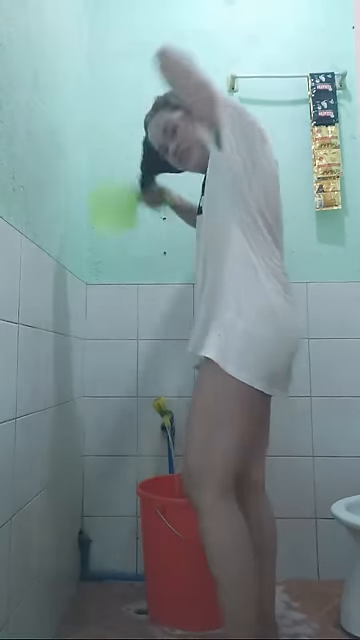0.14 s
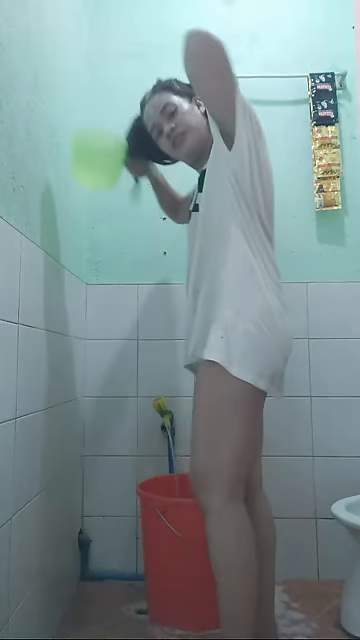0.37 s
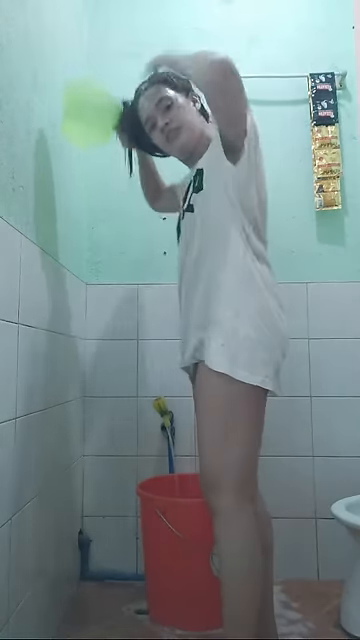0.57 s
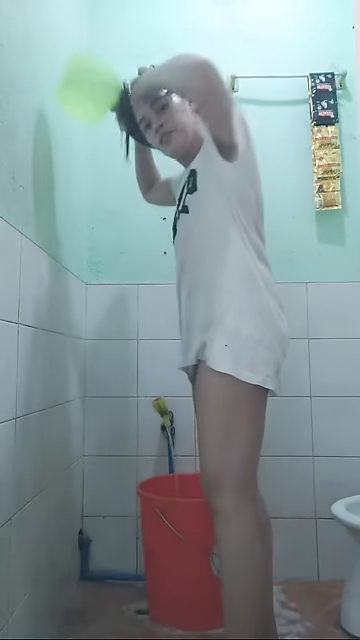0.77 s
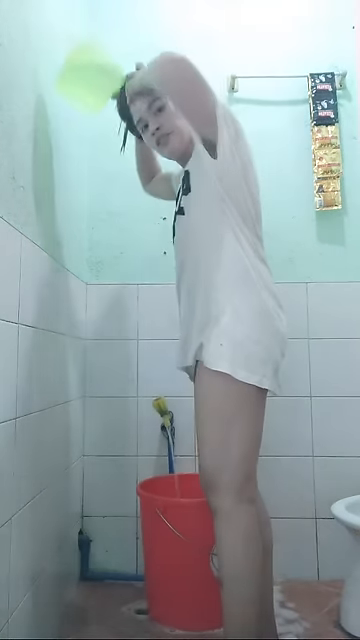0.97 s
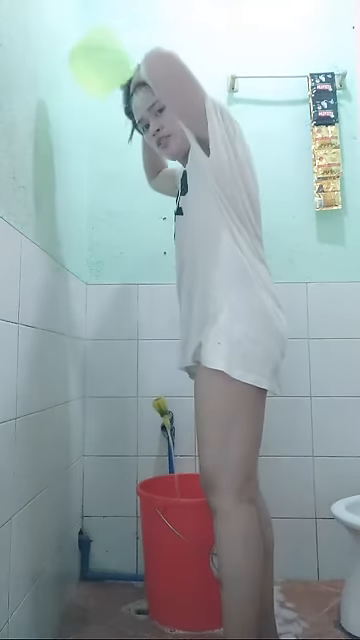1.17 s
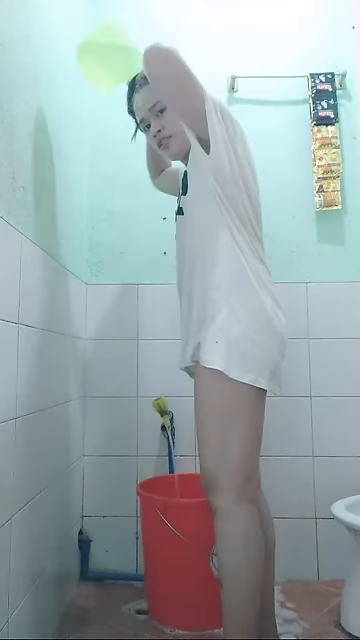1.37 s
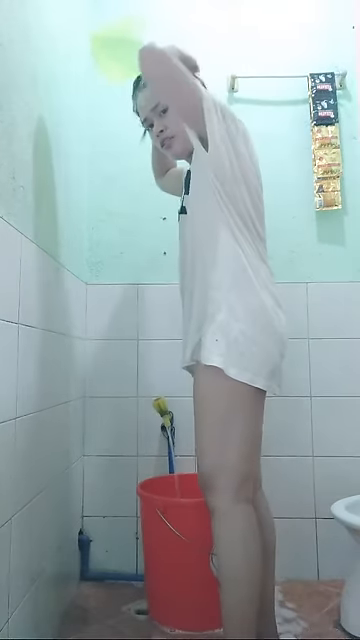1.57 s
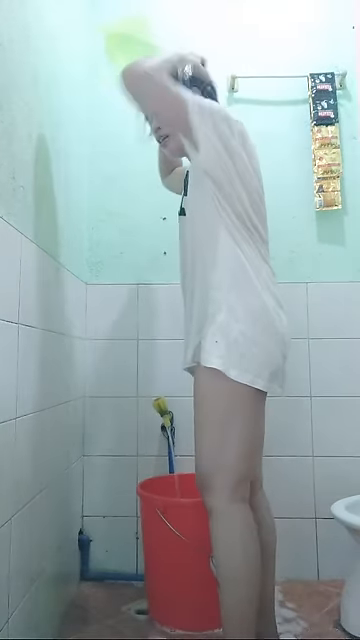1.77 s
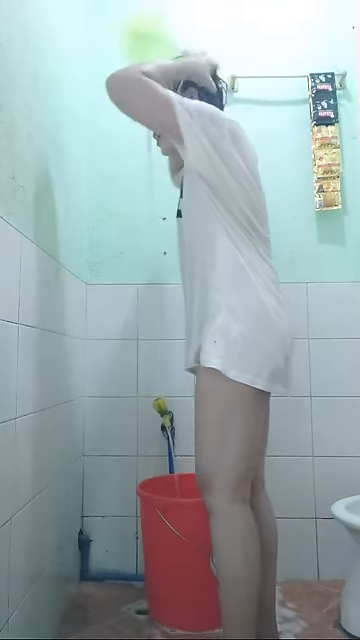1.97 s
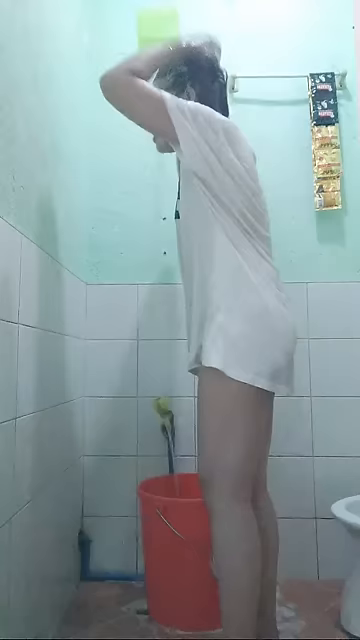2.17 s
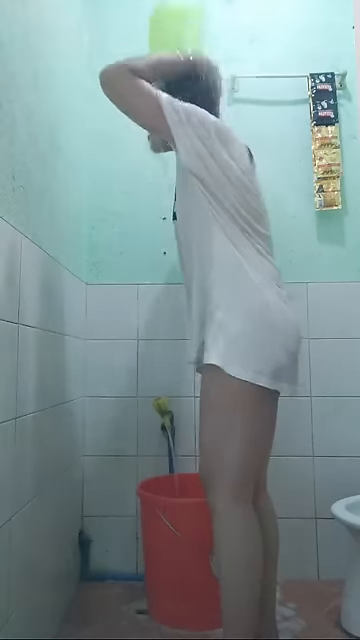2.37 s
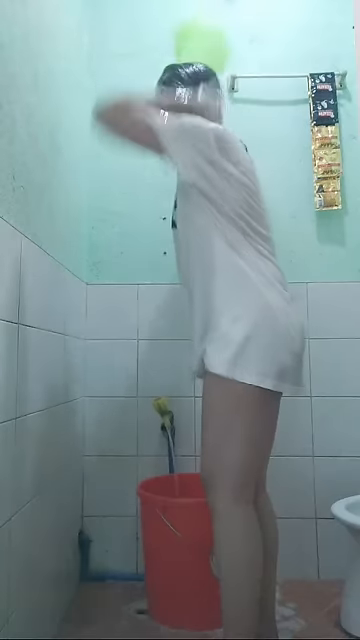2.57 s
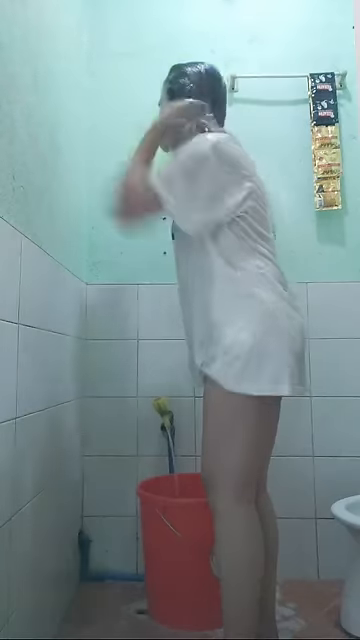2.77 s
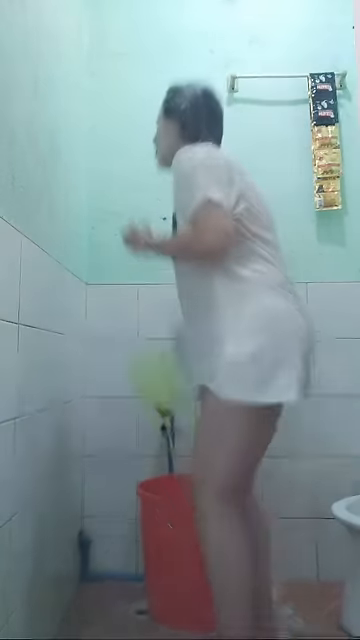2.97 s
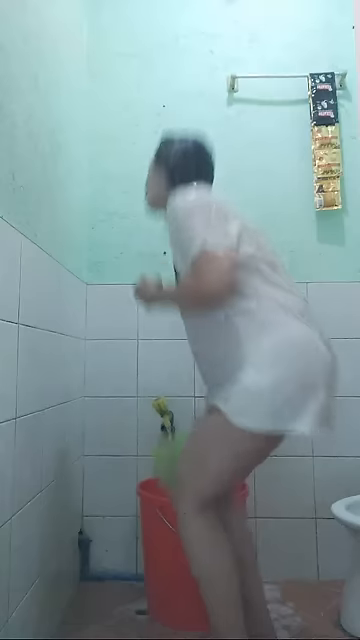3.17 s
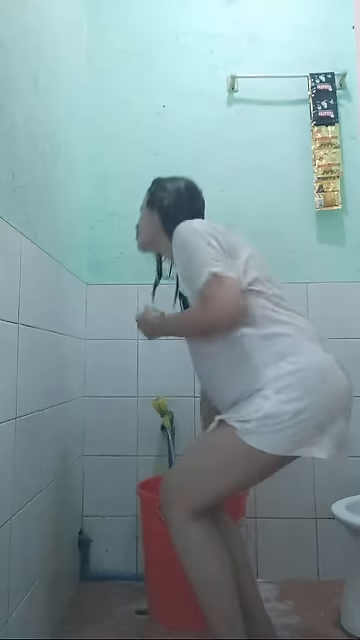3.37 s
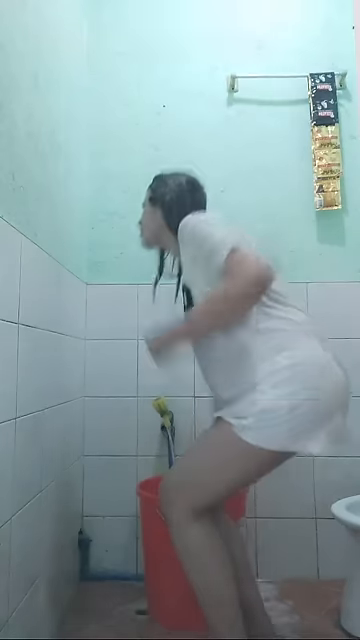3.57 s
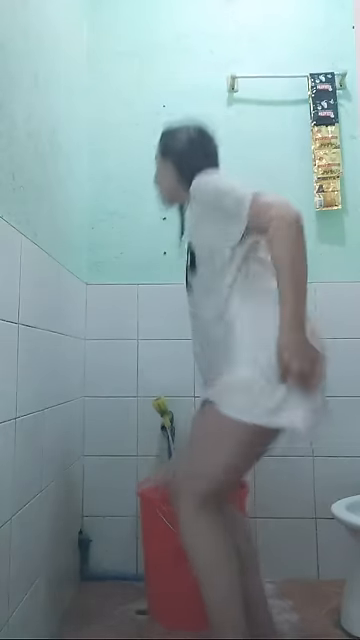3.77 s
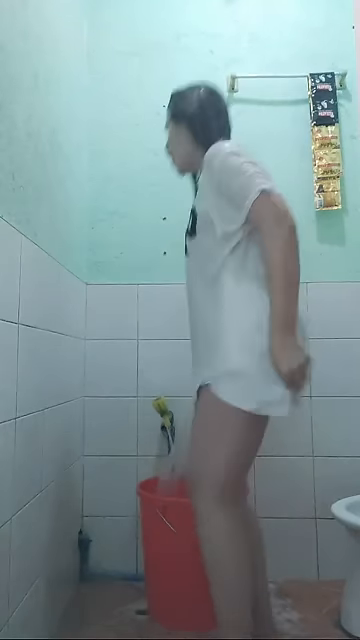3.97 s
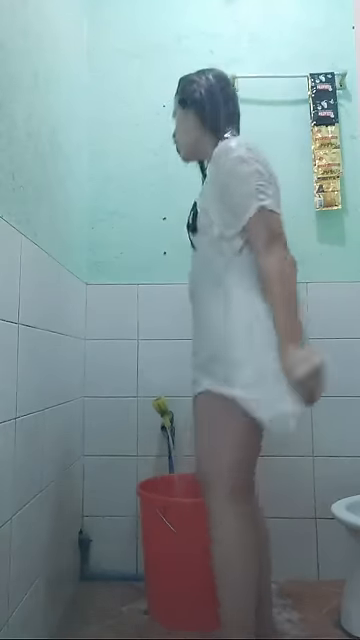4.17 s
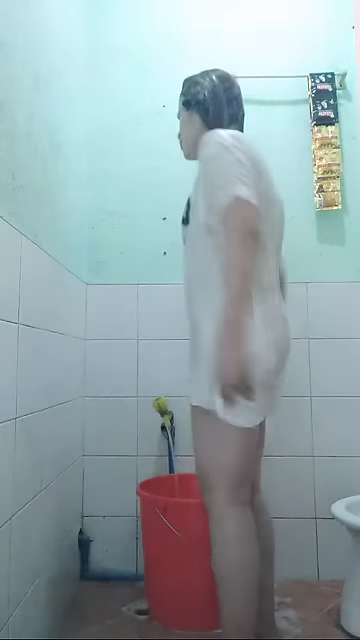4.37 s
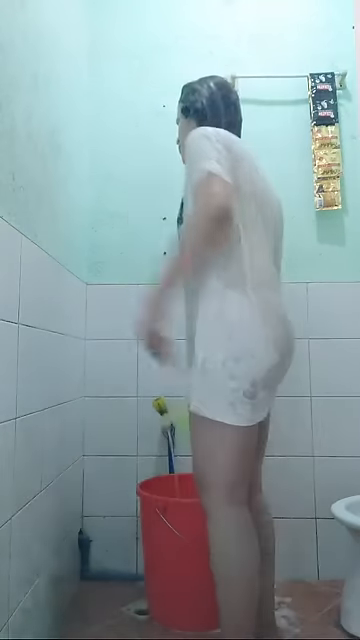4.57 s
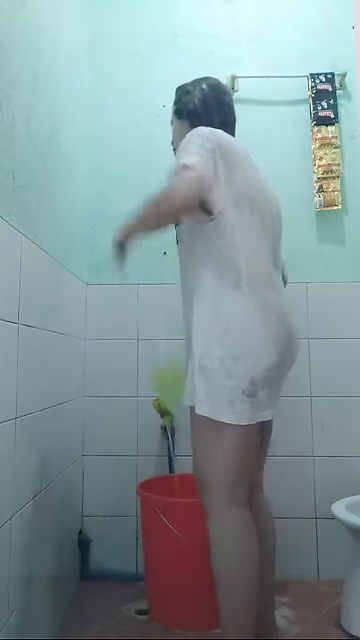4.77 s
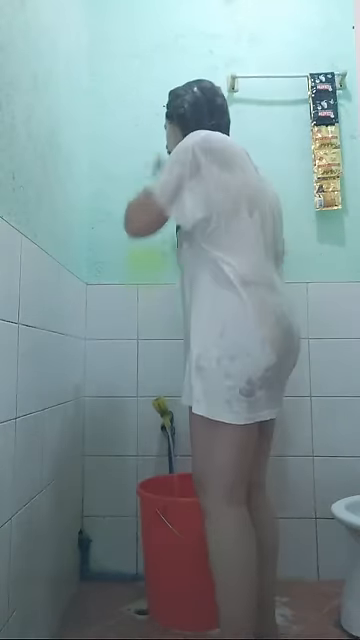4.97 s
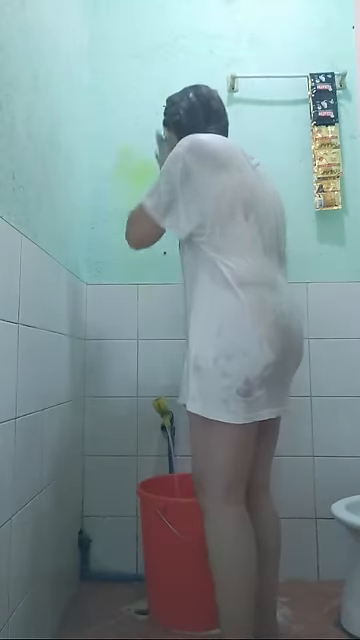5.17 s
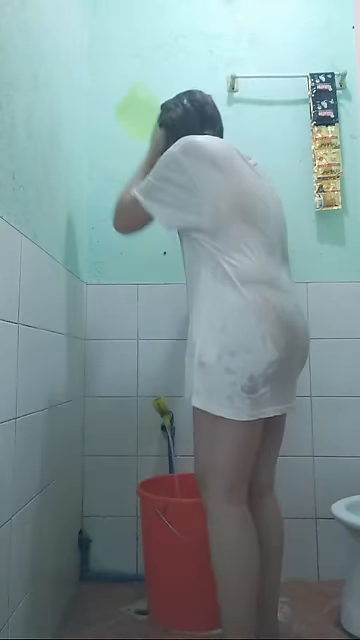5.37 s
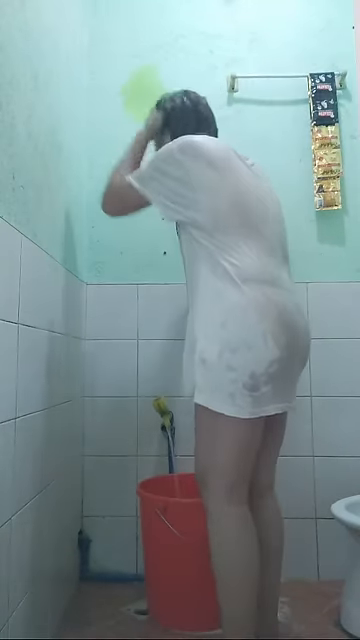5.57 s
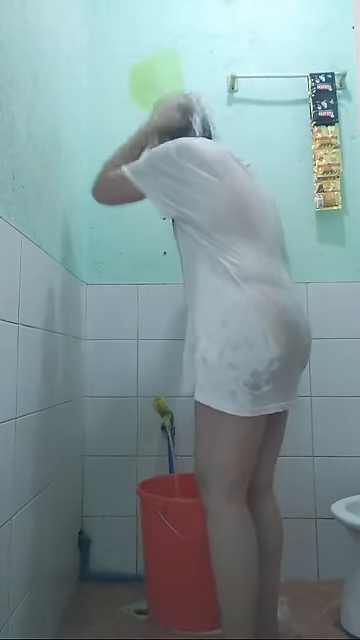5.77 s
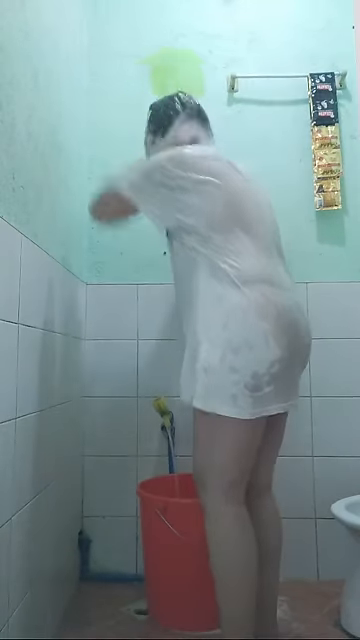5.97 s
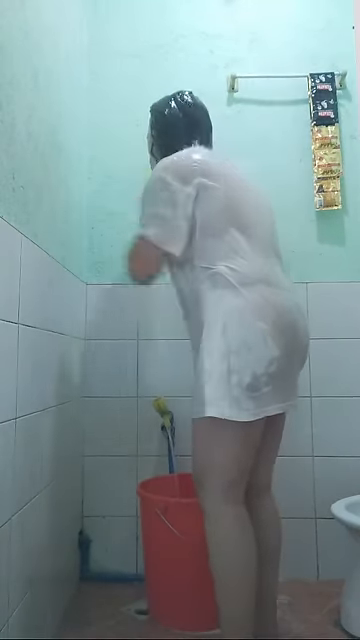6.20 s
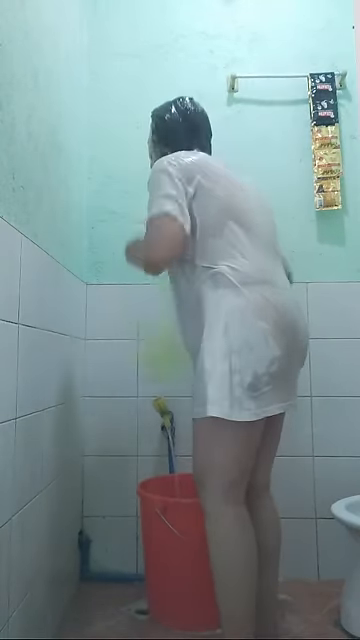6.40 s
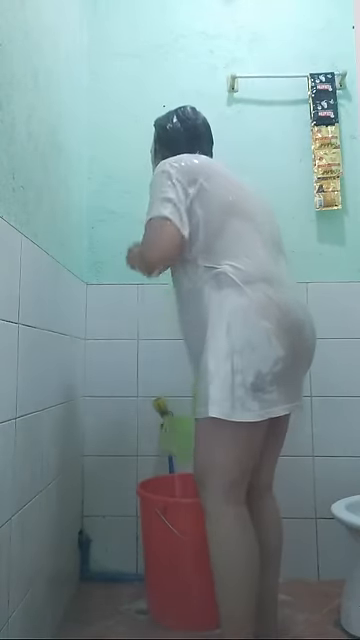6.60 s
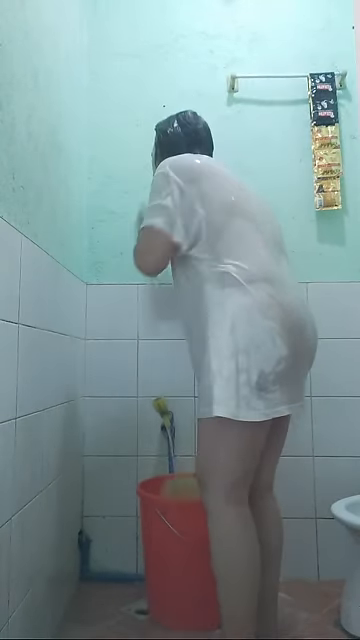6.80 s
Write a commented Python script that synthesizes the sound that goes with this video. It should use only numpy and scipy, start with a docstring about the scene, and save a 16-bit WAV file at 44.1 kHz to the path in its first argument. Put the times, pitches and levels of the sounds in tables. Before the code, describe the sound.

Steady trickle into a half-full bucket, two bursts of poured water slapping tiles, churning between, then a hollow plastic knock.

```python
"""Bathing with bucket and dipper

A tap runs into a half-full plastic bucket in a small tiled bathroom: ticks and bubbles patter and gurgle.
Twice a dipper of water is tipped over a bather and falls on the floor in sheets and drops, made of
filtered clicks and swarms of bubbles. In between, the dipper churns the bucket. At the end it knocks
into the bucket, which rings as a set of fading tones with a noisy crack."""
import sys
import numpy as np
from scipy import signal
from scipy.io import wavfile
from scipy.ndimage import uniform_filter1d

SR = 44100
rng = np.random.default_rng(int(sys.argv[2]) if len(sys.argv) > 2 else 0)


def master(y):
    """Save y as 16-bit WAV."""
    cut = np.clip(np.atleast_2d(y).T, -1, 1)
    pcm = np.round(cut * 32767)  # scale
    wavfile.write(sys.argv[1], SR, pcm.astype(np.int16))


N = 301644
TIME = np.arange(N) / SR  # seconds, whole scene
RING = np.arange(SR // 4) / SR  # seconds, one short event


def amp(db):
    """Turns decibels into gain."""
    return 10 ** (np.asarray(db) / 20)


def evened(x):
    """Scales a sound to an rms of 1."""
    return x / np.sqrt(np.mean(x ** 2) + 1e-20)


def read(points, hz):
    """Reads a table of values between its frequencies, on a log-frequency axis."""
    f, value = np.transpose(points)
    return np.interp(np.log(hz + 1), np.log(f + 1), value)


def add(mix, s, sound):
    """Mixes a sound in at time s."""
    part = mix[max(round(s * SR), 0):][:len(sound)]
    part += sound[:len(part)]


def colour(x, db_at, size=4096):
    """Filters with the gain db_at(Hz), never ahead of time, so that clicks keep their sharp front."""
    hz = abs(np.fft.fftfreq(size, 1 / SR))
    log_gain = np.log(amp(np.maximum(db_at(hz), -100)))
    # the phase that packs the energy as early as possible
    taps = np.fft.ifft(np.exp(np.conj(signal.hilbert(log_gain)))).real
    return signal.oaconvolve(x, taps[:size // 2])[:len(x)]


def wander(depth_db, per_s):
    """A gain that drifts at random, about per_s times a second."""
    steps = rng.standard_normal(1024)
    return amp(depth_db * np.interp(TIME * per_s, np.arange(len(steps)), steps))


def surges(rows, release_s):
    """Gain of overlapping rushes of water (start, attack, length, dB): each rises, holds and dies away."""
    t = TIME[::32]
    power = 0
    for start, attack_s, length, db in rows:
        rise = np.clip((t - start) / attack_s, 0, 1)
        fall = np.exp(-np.maximum(t - start - length, 0) / release_s)
        power = power + (amp(db) * rise * fall) ** 2
    return np.interp(TIME, t, np.sqrt(power))


def together(*gains):
    """Gain of unrelated flows sounding at once: their powers add."""
    return np.sqrt(sum(gain ** 2 for gain in gains))


# how long echoes take to fade by 60 dB
# columns: pitch_hz [Hz], fade_s [s]
ECHO_FADE = [(200, 0.15), (450, 0.56), (1000, 0.31), (3000, 0.37), (7000, 0.3), (15000, 0.25)]


def room(x, direct):
    """Direct sound plus the dense echoes of close tiled walls, with a new echo pattern at each call."""
    taps = rng.standard_normal(len(RING)) * (rng.random(len(RING)) < 1 / 8) * (RING > .002)
    hz, t, z = signal.stft(taps, SR, nperseg=256)
    fading = amp(-60 * t / read(ECHO_FADE, hz)[:, None])
    tail = signal.istft(z * fading, SR, nperseg=256)[1]
    return direct * x + signal.oaconvolve(x, tail / np.linalg.norm(tail))[:len(x)]


def scattered(x, direct, count=5):
    """Drops land all over the place, so each moment meets one of several echo patterns; rms 1."""
    x = np.concatenate([x[-len(RING):], x])  # the water is already running
    place = np.repeat(rng.integers(0, count, len(x) // 256 + 1), 256)[:len(x)]
    heard = 0
    for k in range(count):
        share = uniform_filter1d((place == k) * 1., size=128)
        heard = heard + room(x * np.sqrt(abs(share)), direct)
    return evened(heard[len(RING):])


def event(sound, db, direct):
    """One short sound in the room, with level db over its first 40 ms."""
    heard = room(np.pad(sound, (0, len(RING) - len(sound))), direct)
    return amp(db) * heard / np.sqrt(np.mean(heard[:SR // 25] ** 2) + 1e-20)


def impacts(per_s, spread_db, size=N):
    """Random clicks of either sign: many small, a few large."""
    chance = rng.random(size)
    strength = rng.exponential(1, size)
    sign = rng.choice([-1, 1], size)
    return (chance < per_s / SR) * sign * amp(spread_db * np.minimum(strength, 4))


def drops(spectrum, per_s, spread_db):
    """The sharp ticks of drops landing: clicks filtered to a spectrum; rms 1."""
    return evened(colour(impacts(per_s, spread_db), lambda hz: read(spectrum, hz)))


def bubble(hz, cycles, rise):
    """A ringing air pocket; its pitch climbs as it nears the surface."""
    life = cycles / hz
    t = np.arange(0, min(6 * life, .2), 1 / SR)
    turns = hz * (t + rise * t ** 2 / (2 * life))
    return np.sin(2 * np.pi * turns) * np.exp(-t / life) * (1 - np.exp(-t * hz))


def froth(spectrum, per_s, spread_db, cycles, rise, count=28):
    """A swarm of bubbles of many sizes within a spectrum; rms 1."""
    births = impacts(per_s, spread_db)
    kind = rng.integers(0, count, N)
    rings = []
    for hz in np.geomspace(spectrum[0][0], spectrum[-1][0], count):
        ring = bubble(hz, cycles, rise)
        rings.append(amp(read(spectrum, hz)) * np.sqrt(hz) * ring / np.linalg.norm(ring))
    out = np.zeros(N)
    for at in np.flatnonzero(births):
        add(out, at / SR, births[at] * rings[kind[at]])
    return evened(out)


# tone of the stream spattering on the water
# columns: pitch_hz [Hz], level_db [dB]
SPATTER_COLOUR = [(600, 5), (900, 2.5), (1250, -0.5), (1600, 3), (2200, -0.5), (3400, 0), (4800, -4),
                  (6500, -15.5), (9000, -2.5)]


def patter():
    """The tap's steady stream patters on the water: ticks of drops mixed with small ringing bubbles."""
    ticks = drops(SPATTER_COLOUR, per_s=1100, spread_db=6)
    bubbles = froth(SPATTER_COLOUR, per_s=900, spread_db=0.0, cycles=5.84, rise=0.0746, count=20)
    gain = amp(-57.5) * wander(depth_db=2.5, per_s=11)
    return gain * scattered(ticks + 0.88 * bubbles, direct=0.67, count=4)


# resonances of the air above the water in the bucket
# columns: pitch_hz [Hz], width_hz [Hz], level_db [dB]
HOLLOW = [(401, 6.4, 1.5), (450, 31, -5.5), (485, 12, 4), (550, 27, -11.5)]
# spells in which the stream drags down more air and the bucket gurgles
# columns: start_s [s], length_s [s], level_db [dB]
GURGLES = [(0, .14, -56), (0.576, .17, -56), (0.954, 0.063, -50.5), (1.256, 0.058, -56), (1.5, 0.24, -56.5),
           (1.8, .7, -55.5), (2.602, .22, -58), (2.977, .06, -46), (3.346, .38, -53), (3.95, 0.37, -57.5),
           (4.424, 0.71, -56.5), (5.257, 0.36, -58.5), (6.315, 0.084, -50.5)]


def gurgle():
    """The stream drags air under; the bubbles boom in the hollow of the bucket, more so in spells."""
    spells = surges([(s, 0.019, length, db) for s, length, db in GURGLES], release_s=.05)
    gain = together(amp(-60.5), spells)  # a murmur is always there
    gulps = froth([(385, -0.96), (640, -1.1)], per_s=240, spread_db=2.5, cycles=4.66, rise=0.051, count=10)

    def hollow(hz):
        power = sum(amp(db) ** 2 / (1 + (2 * (hz - f) / width) ** 2) for f, width, db in HOLLOW)
        return 10 * np.log10(power)

    return gain * evened(colour(scattered(gulps, direct=0.97, count=3), hollow))


# the largest bubbles, in bucket and puddles; levels compare one with another
# columns: start_s [s], pitch_hz [Hz], level_db [dB]
BUBBLES = [(.098, 399, -52), (.395, 541, -50.5), (.63, 387, -50.5), (0.685, 1633, -49.5),
           (.808, 557, -59.5), (0.855, 1880, -54), (.899, 429, -51.5), (.954, 1520, -53), (1.012, 506, -50),
           (1.325, 3530, -49), (1.347, 479, -50), (1.464, 485, -51), (1.602, 439, -51), (1.72, 458, -54),
           (1.964, 474, -47.5), (2.079, 424, -50.5), (2.406, 457, -51), (2.8, 476, -50),
           (2.959, 955, -47.5), (3.02, 485, -47), (3.207, 1066, -47.5), (3.448, 3130, -46),
           (3.585, 685, -45.5), (3.667, 934, -46), (3.698, 417, -46), (3.717, 1372, -44.5),
           (3.74, 1035, -46), (3.85, 1300, -49), (4.117, 830, -48), (4.189, 1550, -48), (4.197, 1938, -49),
           (4.416, 473, -48), (4.475, 1015, -40.5), (4.484, 1713, -44.5), (4.497, 1070, -41),
           (4.63, 548, -53.5), (4.922, 609, -48), (4.923, 2380, -43.5), (5.029, 1484, -44.5),
           (5.189, 1050, -52), (5.283, 2830, -51.5), (5.29, 486, -45.5), (5.398, 483, -49.5),
           (5.513, 461.5, -45.5), (5.56, 2830, -49.5), (5.562, 1394, -50.5), (5.676, 627, -51.5),
           (5.727, 442, -54), (6.0, 830, -47), (6.119, 533.6, -45), (6.272, 935, -46), (6.345, 547, -51.5),
           (6.477, 1510, -41.5), (6.529, 2130, -42), (6.578, 463, -41.5)]


def plops():
    """Single large bubbles in the bucket and in the puddles, each born in a small wet burst."""
    out = np.zeros(N)
    for s, hz, db in BUBBLES:
        ring = bubble(hz, cycles=10 + hz / 300, rise=0.016)  # small bubbles ring for more cycles
        t = RING[:len(ring)]
        ring = ring * (1 - np.exp(-t / .003))  # the neck takes a moment to pinch off
        burst = rng.standard_normal(len(t)) * t * np.exp(-t / 0.0066)  # swells as the cavity closes
        near_pitch = lambda f: -24 * np.log10(1 + (np.log2((f + 1) / hz) / 0.35) ** 2)
        burst = colour(burst, near_pitch, size=1024)
        wetness = .85 * min(hz / 1500, 1.4)  # deep bubbles ring clean
        add(out, s, event(evened(ring) + wetness * evened(burst), db - 3.5, direct=1.0))
    return out


# the dipper hitting bucket and water; hollow_db weighs the low ring
# columns: start_s [s], level_db [dB], hollow_db [dB]
KNOCKS = [(6.749, -40.5, -16), (6.7592, -34, -11.5), (6.78, -41, -2)]
# what dipper and bucket ring with; fade_s is the time to fade by 60 dB
# columns: pitch_hz [Hz], level_db [dB], fade_s [s]
PLASTIC = [(274, -19, 0.058), (391, 13, 0.16), (970, -12, 0.024), (1136, 0, 0.065), (1520, 3, 0.031),
           (1840, -1, 0.065), (2600, 8, 0.031), (3300, 9, 0.017), (4070, -16, 0.033), (4720, 7, 0.012)]


def knocks():
    """The dipper cracks against the bucket and plunges; low tones boom when its mouth meets the water."""
    out = np.zeros(N)
    for s, db, hollow_db in KNOCKS:
        ring = 0
        for hz, level, fade_s in PLASTIC:
            decay = amp(level + hollow_db * (hz < 500) - 60 * RING / fade_s)
            ring = ring + decay * np.sin(2 * np.pi * (hz * RING + rng.random() / 2))
        crack = 4.1 * rng.standard_normal(len(RING)) * np.exp(-RING / 0.0039)
        add(out, s, event(ring + crack, db, direct=0.7))
    return out


# the largest lumps of water hitting the tiles; levels compare one with another
# columns: start_s [s], level_db [dB], centre_hz [Hz], width_octaves [octaves], decay_s [s]
SPLATS = [(.044, -60.5, 3600, .22, 0.013), (.1, -58, 3500, 0.1, .025), (.212, -53, 2920, .18, 0.0065),
          (.215, -56, 6850, .25, 0.009), (.266, -53.5, 3200, 0.31, 0.0086), (.289, -58.5, 1380, .5, .03),
          (0.336, -48.5, 3300, .36, 0.0064), (0.382, -57, 840, 0.27, 0.024),
          (.392, -54.5, 3300, 0.5, 0.012), (.466, -60, 1500, .6, .009), (.68, -57.5, 5040, 0.46, 0.021),
          (.728, -56, 4230, 0.52, .01), (.81, -59, 3000, .7, 0.021), (.897, -49, 4500, 0.48, .007),
          (.904, -54, 920, 0.68, 0.018), (.998, -53.5, 4100, 0.22, .009), (1.277, -52, 5900, 1, .015),
          (1.512, -53.5, 1090, 0.97, 0.037), (1.537, -51, 3360, .27, .004), (1.57, -55.5, 5000, 1, 0.0082),
          (1.766, -53.5, 6500, .44, 0.0051), (1.77, -60, 1060, 0.29, 0.0068), (2.046, -50, 6300, 1, 0.022),
          (2.113, -31.5, 9060, 0.19, 0.0093), (2.134, -45, 4440, .22, 0.01),
          (2.272, -39.5, 3300, 0.62, 0.015), (2.321, -39, 3460, 0.4, 0.0035),
          (2.38, -38.5, 2720, 0.38, .009), (2.627, -42, 6700, 0.8, 0.01), (2.732, -42.5, 2880, 1, 0.013),
          (2.811, -39.5, 3300, 1, 0.007), (3.159, -43, 3300, 0.28, 0.025), (3.2, -47, 3140, 0.37, 0.011),
          (3.447, -46.5, 2440, .56, 0.0085), (3.655, -43, 650, 0.91, 0.02), (3.735, -46, 2320, 0.83, 0.02),
          (4.03, -43.5, 4150, 1, 0.022), (4.125, -46, 2190, .5, 0.039), (4.233, -44, 4070, 0.75, .008),
          (4.365, -43.5, 5630, 1, 0.077), (4.573, -48.5, 6500, 0.23, 0.0047),
          (4.875, -44.5, 4160, 1, 0.022), (4.979, -46.5, 1260, 0.18, 0.019), (5.03, -49, 1960, 0.57, .008),
          (5.189, -52.5, 4400, 1, 0.016), (5.369, -45, 5460, 0.79, 0.024), (5.47, -54.5, 3300, 0.37, 0.019),
          (5.67, -51, 3730, 0.22, .015), (5.974, -53, 1470, 0.99, 0.032), (6.088, -39.5, 6530, .2, 0.017),
          (6.125, -38.5, 6500, 0.73, .012), (6.175, -48.5, 3660, 0.46, .008),
          (6.332, -40, 6960, 0.57, 0.011), (6.434, -40, 3600, 0.79, 0.028),
          (6.542, -41.5, 3320, 0.26, 0.0069), (6.617, -39.5, 3300, 0.44, .012)]


def splats():
    """A lump of water breaks into a fast run of ticks, coloured by the air it traps."""
    out = np.zeros(N)
    for s, db, centre, width, decay in SPLATS:
        ticks = impacts(per_s=7200, spread_db=2.5, size=len(RING)) * np.exp(-RING / decay)
        ticks = ticks * (1 - np.exp(-RING / 0.0029))  # the lump flattens before it bursts

        def pocket(hz):
            peak = -18 * np.log10(1 + (np.log2((hz + 1) / centre) / width) ** 2)
            return peak - 30 / (1 + (hz / 250) ** 2)  # little bass

        add(out, s, event(colour(ticks, pocket), db - .5, direct=0.74))
    return out


# water running off hair and shirt, swelling with each dipperful and draining away
# columns: time_s [s], flow_db [dB]
RUNOFF = [(0, -56), (1.05, -59.5), (2.08, -57.5), (2.3, -46.5), (3.25, -44), (3.75, -45.5), (4.25, -43.5),
          (4.75, -48.5), (5.1, -53.5), (5.6, -49), (6.1, -41.5), (6.3, -43), (6.84, -37.5)]


def runoff_flow():
    """Strength of the water running off the bather, slightly unsteady."""
    return amp(np.interp(TIME, *np.transpose(RUNOFF))) * wander(depth_db=0.33, per_s=16)


# brief showers of fine droplets flung from hair and hands
# columns: start_s [s], level_db [dB]
FLICKS = [(.085, -50), (.165, -52.5), (.37, -51.5), (.72, -50), (1.12, -54), (1.21, -57), (1.41, -53),
          (1.55, -58), (1.65, -52.5), (1.81, -57), (2.005, -49.5), (3.27, -45), (3.42, -42), (4.015, -36),
          (4.35, -47), (4.45, -46), (4.575, -48), (4.7, -61), (4.882, -38), (5.5, -48), (5.87, -44),
          (6.07, -37.5), (6.172, -32.5), (6.26, -34.5)]


def flick_flow():
    """Strength of the flung droplets: each shower is a short swell of spray."""
    attack_s, length_s, release_s = 0.012, 0.037, 0.049
    return surges([(s, attack_s, length_s, db) for s, db in FLICKS], release_s)


# sheets of water falling on the floor
# columns: start_s [s], length_s [s], spray_db [dB], slap_db [dB]
SHEETS = [(2.103, 0.24, -36, -48.5), (2.231, 0.16, -39, -41), (2.456, .04, -42, -42.5),
          (2.64, 0.12, -37.5, -60), (2.718, 0.11, -33.5, -39), (2.795, 0.13, -30, -44),
          (3.029, 0.066, -31, -39.5), (3.138, 0.046, -36.5, -41.5), (6.324, 0.12, -30.5, -52),
          (6.407, .12, -32, -38.5), (6.58, 0.075, -36.5, -42)]


def sheet_flows():
    """Strength of spray and slap from falling sheets; the fine spray lingers after the slap."""
    attack_s = 0.033
    spray_flow = surges([(s, attack_s, length, db) for s, length, db, _ in SHEETS], release_s=0.093)
    slap_flow = surges([(s, attack_s, length, db) for s, length, _, db in SHEETS], release_s=0.072)
    return spray_flow, slap_flow * wander(depth_db=0.5, per_s=45)


# tone of the fine spray
# columns: pitch_hz [Hz], level_db [dB]
SPRAY_COLOUR = [(800, -47), (2500, -9.5), (4500, -6.5), (6500, -7.5), (9000, 4), (12000, 0), (16000, 1)]


def spray():
    """Water bursts into fine drops, heard as a dense hiss of ticks from many places."""
    return scattered(drops(SPRAY_COLOUR, per_s=1600, spread_db=4.5), direct=0.15, count=7)


# tone of water slapping the floor
# columns: pitch_hz [Hz], level_db [dB]
SLAP_COLOUR = [(500, -17.5), (1200, -4), (2200, -0.5), (3700, 1.5), (5000, -9), (6600, 0), (9000, -9)]


def slap():
    """Water slaps the floor in ticks and bubbles, flickering as the falling sheet tears into clumps."""
    ticks = drops(SLAP_COLOUR, per_s=1100, spread_db=5)
    bubbles = froth(SLAP_COLOUR, per_s=600, spread_db=2.5, cycles=8.0, rise=0.0995, count=40)
    clumps = evened(uniform_filter1d(rng.standard_normal(N), size=500))
    return scattered((ticks + 1.5 * bubbles) * amp(2.5 * clumps), direct=0.6, count=4)


# the water in the bucket is stirred up, by the dipper or by water falling back
# columns: start_s [s], swell_s [s], length_s [s], level_db [dB]
CHURNS = [(2.25, 0.032, 0.042, -61), (2.57, 0.022, .05, -53), (2.73, 0.018, 0.31, -54),
          (3.15, 0.33, 0.64, -46.5), (3.655, .01, 0.053, -47), (3.8, 0.058, .39, -48),
          (4.26, 0.024, 0.025, -56), (4.57, 0.017, 0.34, -55), (4.9, 0.013, 0.18, -53),
          (5.18, 0.018, 0.041, -54), (5.66, 0.013, 0.12, -53), (5.975, 0.0093, 0.022, -45),
          (6.2, .06, 0.14, -48.5), (6.42, 0.047, 0.27, -52), (6.75, 0.0046, 0.011, -41.5)]
# tone of the stirred water
# columns: pitch_hz [Hz], level_db [dB]
CHURN_COLOUR = [(350, -13.5), (550, -7.5), (750, -4.5), (1000, -2), (1500, -6.5), (2200, -9.5)]


def churn():
    """Stirred water folds in air, which rings as large bubbles among splashing ticks."""
    bubbles = froth(CHURN_COLOUR, per_s=320, spread_db=2.8, cycles=6.5, rise=.08, count=30)
    ticks = drops(CHURN_COLOUR, per_s=350, spread_db=5)
    return scattered(bubbles + .6 * ticks, direct=0.61, count=3)


# tone of the low thud of heavy water
# columns: pitch_hz [Hz], level_db [dB]
THUD_COLOUR = [(25, -30), (70, -7.5), (130, -3), (200, -7), (280, 10), (340, 5.5), (500, 3), (1000, -37.5)]


def thud():
    """The weight of the water thuds: random clicks filtered down to the bass."""
    return evened(room(drops(THUD_COLOUR, per_s=700, spread_db=4.5), direct=0.39))


def pour():
    """Moving water sprays, slaps, churns and thuds, each as strongly as the flows of the moment drive it."""
    runoff = runoff_flow()
    sheet_spray, sheet_slap = sheet_flows()
    spray_gain = together(runoff, sheet_spray, flick_flow())
    slap_gain = together(amp(-4) * runoff, sheet_slap)
    churn_gain = surges(CHURNS, release_s=0.089)
    # the thud: steady under the tap, plus a share of churning and slapping
    thud_gain = together(amp(-73.5), amp(-15) * churn_gain, amp(-26.5) * slap_gain)
    return spray_gain * spray() + slap_gain * slap() + churn_gain * churn() + thud_gain * thud()


# standing waves between the close walls
# columns: pitch_hz [Hz], level_db [dB]
STANDING = [(150, -2), (260, -2), (295, -5), (322, 1), (345, -7), (368, -6.5), (392, 1), (450, -3),
            (485, -5), (515, -2), (545, 1), (640, 0.5), (685, 2), (725, -1), (775, 2), (850, 0.5), (975, 2),
            (1100, -1.5), (1300, -0.5)]


def scene():
    """All the water and the knocks, heard from one point of the small room with its standing waves."""
    mix = tap_and_bath = patter() + gurgle() + plops() + knocks() + splats() + pour()
    mix = colour(mix, lambda hz: read(STANDING, hz), size=8192)
    return np.array([mix, mix])


# how strongly the microphone picks up each pitch
# columns: pitch_hz [Hz], level_db [dB]
MICROPHONE = [(20, -18), (60, -6.5), (130, -4), (250, 1.5), (5500, 2), (6600, 4), (7900, -4.5), (8100, 0),
              (8800, -5), (9900, -9), (11000, -4), (11850, -3), (12080, 2.5), (15500, 0.5)]
EDGE_HZ = 15750  # nothing much is heard above this


def record(dry):
    """One small microphone with uneven treble feeds both channels; then the band limit."""
    coloured = colour(dry.mean(axis=0), lambda hz: read(MICROPHONE, hz))
    lowpass = signal.firwin(601, EDGE_HZ, window=("kaiser", 8), fs=SR)
    limited = signal.oaconvolve(coloured, lowpass, "same")
    return np.array([limited, limited])


dry = scene()
out = record(dry)
master(out)
```